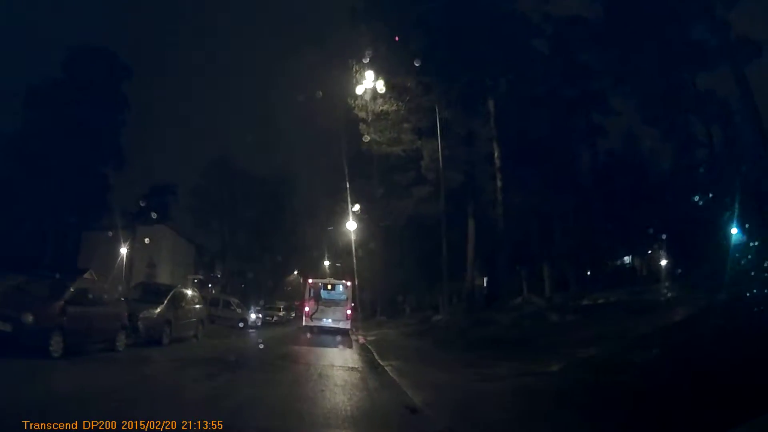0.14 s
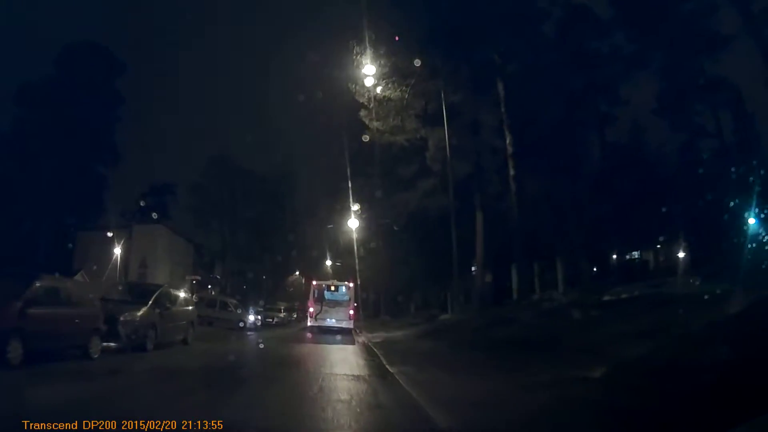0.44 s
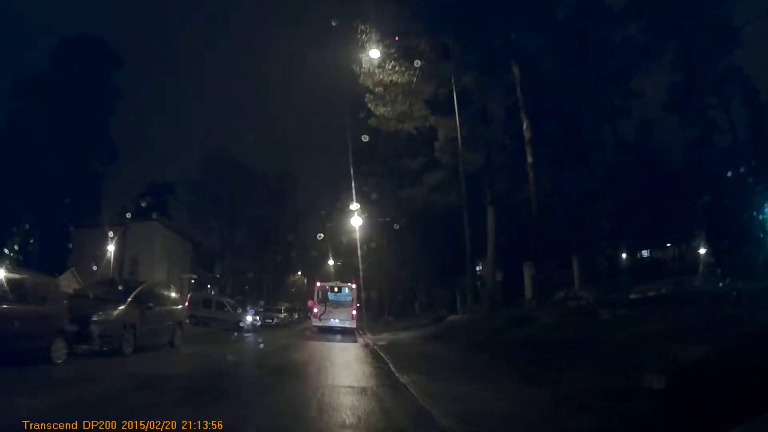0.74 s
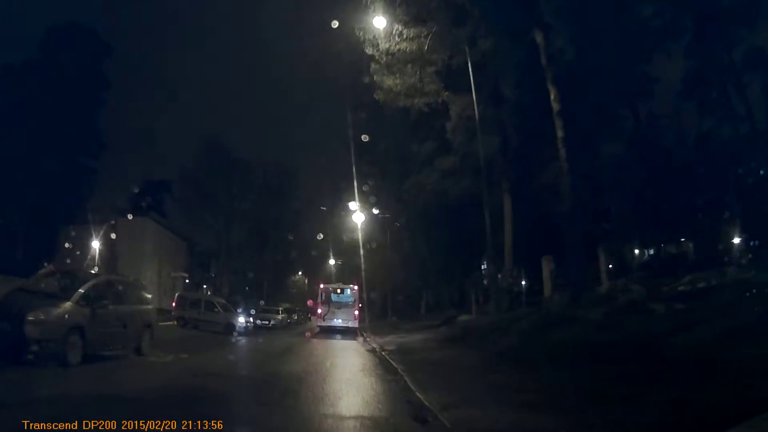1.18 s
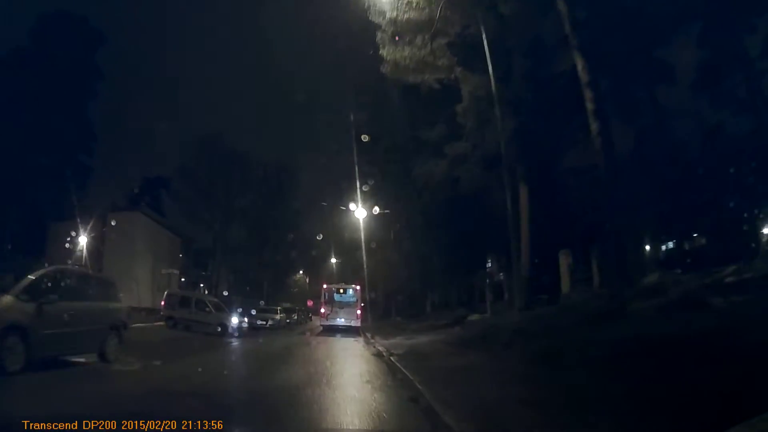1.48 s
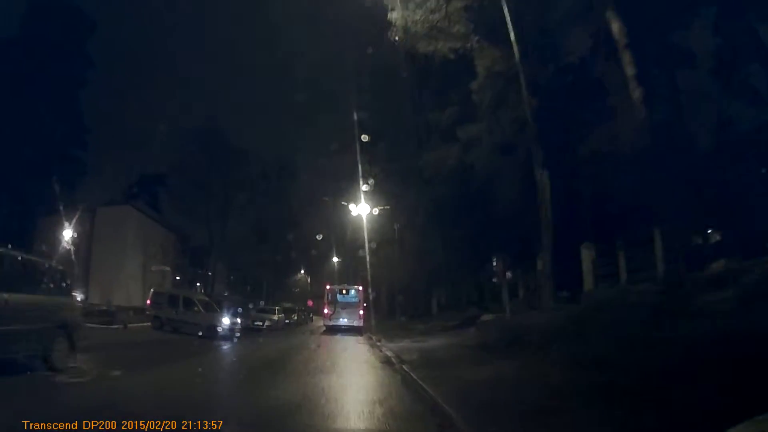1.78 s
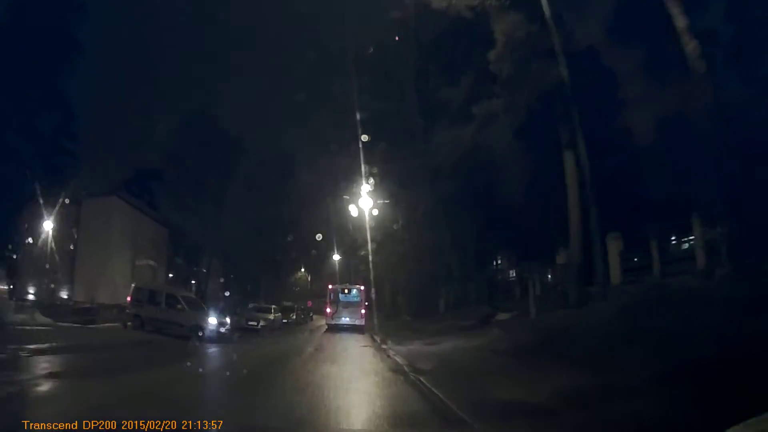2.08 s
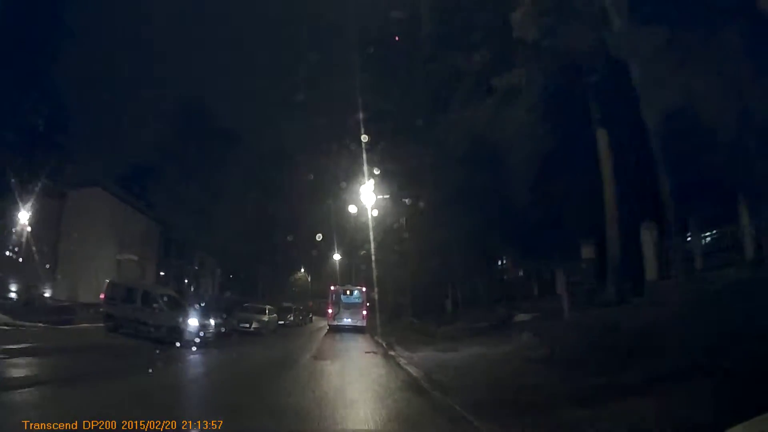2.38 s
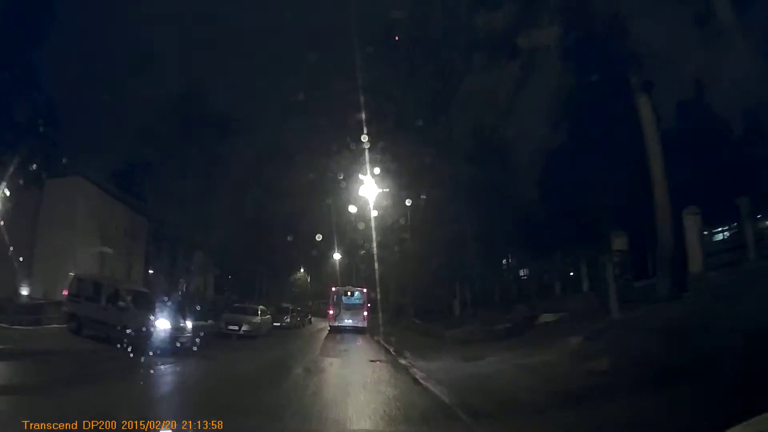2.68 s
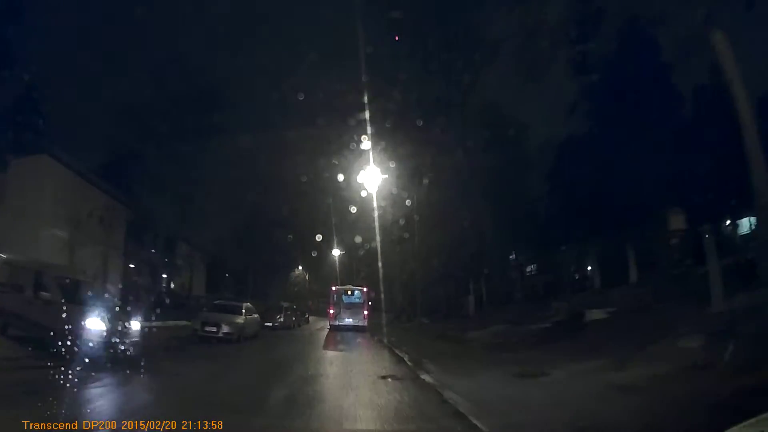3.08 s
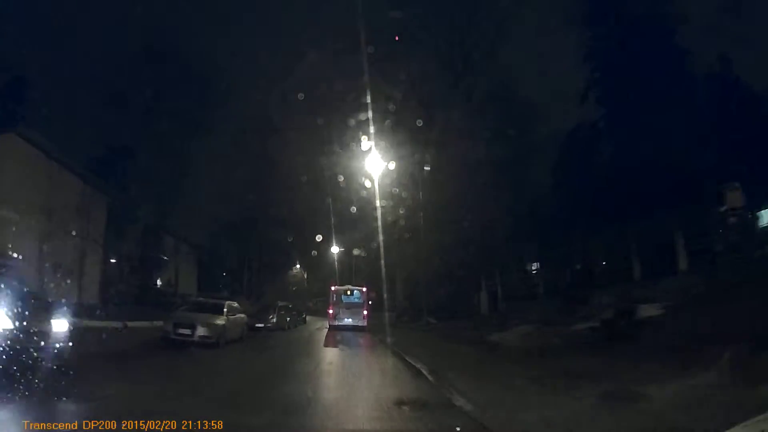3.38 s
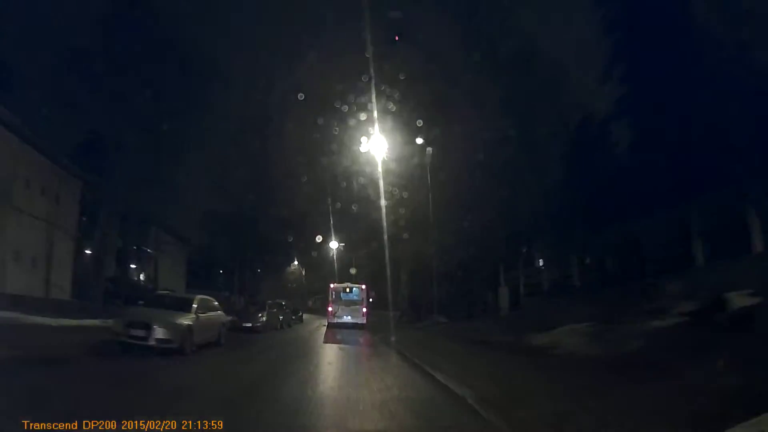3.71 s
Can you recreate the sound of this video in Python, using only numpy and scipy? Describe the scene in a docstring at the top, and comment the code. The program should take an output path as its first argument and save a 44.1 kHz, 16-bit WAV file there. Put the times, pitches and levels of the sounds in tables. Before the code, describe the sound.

A car engine speeds up, heard from inside the cabin by a small windscreen camera: a low drone rises and grows louder over steady tyre roar and faint hiss, with one sharp click midway.

```python
"""Inside a car speeding up along a wet street at night, heard by a small camera on the windscreen.
Multiples of a rising firing rate climb through the cabin booms, over coloured-noise road roar and treble hiss.
Two faint wavering lines squeak near 0.9 s; a switch snaps at 1.92 s as shaped pushes with a buzz.
Near 2.9 s quick chirps make a trill, and two decaying sines tick in the trim."""
import sys
import numpy as np
from scipy import signal
from scipy.fft import rfft, irfft
from scipy.io import wavfile
from scipy.ndimage import uniform_filter1d

SR = 44100
rng = np.random.default_rng(int(sys.argv[2]) if len(sys.argv) > 2 else 0)


def waveform_to_disk(signal):
    """Save audio, clipped to [-1, 1], as 16-bit WAV at the path in sys.argv[1]."""
    frames = np.transpose(np.atleast_2d(signal))
    scaled = np.clip(frames, -1, 1) * 32767
    samples = np.round(scaled).astype(np.int16)
    wavfile.write(sys.argv[1], SR, samples)


def amplitude_ratio(level_db):
    """Convert a level in decibels to the matching linear amplitude (field) ratio."""
    exponent = np.asarray(level_db, float) / 20
    return 10 ** exponent


N = 169785


def curve(table, x, log=False):
    """Reads a two-column table along straight lines, on a linear or log axis."""
    points, values = np.array(table, float).T
    if log:
        return np.interp(np.log(x), np.log(points), values)
    return np.interp(x, points, values)


def walk(rate_hz):
    """Random levels held 1 / rate_hz seconds and slewed twice; spread near 1."""
    hold = int(SR / rate_hz)
    steps = np.repeat(rng.standard_normal(N // hold + 1), hold)
    return 1.45 * uniform_filter1d(uniform_filter1d(steps, hold), hold)[:N]


def bands(colour, centres_hz, shared_db, own_db, rate_hz):
    """Coloured noise of rms 1; overlapping bands flicker both together and on their own."""
    hz = np.arange(N // 2 + 1) * SR / N + 1e-9
    inside = (hz > colour[0][0]) * (hz < colour[-1][0])
    spectrum = rfft(rng.standard_normal(N)) * amplitude_ratio(curve(colour, hz, log=True)) * inside
    noise = np.zeros(N)
    for hat in np.eye(len(centres_hz)):
        band = irfft(spectrum * np.interp(hz, centres_hz, hat), N)
        noise += band * amplitude_ratio(shared_db + own_db * walk(rate_hz))
    return noise / np.sqrt(np.mean(noise ** 2))


def hump(hz, width_hz, flicker_db, rate_hz):
    """A narrow flickering band of noise, rms 1."""
    colour = [(hz - 2 * width_hz, -24), (hz, 0), (hz + 2 * width_hz, -24)]
    return bands(colour, [hz], 0, flicker_db, rate_hz)


def gate(t, span_s, edge_s):
    """Rises at the start of a span and falls at its end."""
    return np.clip(np.minimum(t - span_s[0], span_s[1] - t) / edge_s + .5, 0, 1)


def engine(t):
    """Multiples of the firing rate, each weighted by the cabin at its present pitch."""
    # Each row: time in seconds, firing rate in Hz.
    firing_rate = [(0.0, 31.74), (0.27, 33.64), (0.39, 34.52), (0.47, 34.78), (0.88, 40.35), (1.15, 43.81),
                   (1.78, 52.64), (1.93, 54.3), (2.12, 56.93), (2.42, 61.83), (3.37, 73.84), (3.58, 76.65),
                   (3.7, 78.4), (3.85, 79.7)]
    # Each row: multiple of the firing rate, relative level in dB.
    orders = [(1, -4.5), (2, 0.0), (3, 1.85), (4, 3), (5, 0), (6, -3), (7, 0.5)]
    # Cabin response to an engine tone. Each row: frequency in Hz, level in dB before order and load.
    cabin = [(30, -71), (42, -48), (52, -44.5), (72, -46.5), (85, -45), (105, -43.5), (122, -48),
             (132, -43.5), (144, -37.5), (155, -44), (164, -45.5), (173, -53.5), (188, -52), (202, -62.5),
             (212, -53.5), (224, -52), (235, -50), (257, -50), (272, -53), (290, -47.5), (300, -60.5),
             (311, -56), (322, -61.5), (332, -49), (350, -48), (385, -53.5), (400, -69.5), (440, -71.5),
             (480, -71.5), (500, -58), (520, -65.5), (560, -63)]
    # Each row: time in seconds, gain from engine load in dB.
    load = [(0, -26), (0.1, -16), (0.3, -13), (0.6, -11.5), (1, -11), (1.5, -8.5), (2, -7.5), (2.5, -2),
            (3, 0), (3.4, 1.1), (3.85, 1.5)]
    speed_jitter, wobble_db, drift_turns = .001, .6, .025
    shift_turns, shift_at_hz, shift_fade_hz = 1.4, 35, 13.5

    hz = curve(firing_rate, t) * (1 + speed_jitter * walk(8.75))
    phase = 2 * np.pi * np.cumsum(hz) / SR
    tones = np.zeros(N)
    for multiple, order_db in orders:
        tone_hz = multiple * hz
        level_db = order_db + curve(cabin, tone_hz, log=True) + wobble_db * walk(6.87)
        # the lowest tones arrive late; every tone drifts a little
        shift = shift_turns * np.exp((shift_at_hz - tone_hz) / shift_fade_hz)
        drift = multiple * drift_turns * walk(3.973)
        tones += amplitude_ratio(level_db) * np.cos(multiple * phase + 2 * np.pi * (shift + drift))
    return np.sqrt(2) * tones * amplitude_ratio(curve(load, t)), phase  # sqrt(2): rms to peak


def road(t, phase):
    """Tyre and body roar with a narrow resonance, throbbing slightly with the firings."""
    # Each row: frequency in Hz, relative density in dB per Hz.
    colour = [(12, -58), (20, -15.5), (65, -13.5), (135, -7.5), (197, -8.5), (246, -3.5), (300, -7),
              (375, -3.5), (478, -6), (559, -4.5), (713, -13.5), (871, -10.5), (1060, -21.5), (1220, -24),
              (1390, -30.5), (1480, -29), (1620, -34.5), (2260, -31), (2590, -28), (3020, -40.5),
              (3450, -40), (4030, -61.5), (5240, -99), (8870, -120)]
    # Each row: time in seconds, level of the 400-1200 Hz part in dB.
    level = [(0.0, -53.5), (0.41, -52), (0.62, -52.5), (1.59, -51.5), (2.04, -50.5), (2.79, -50.5),
             (3.14, -49), (3.42, -50.5), (3.85, -50)]
    flicker_db, cycle_depth = 0.67, 0.058
    resonance_hz, resonance_width_hz, resonance_db = 2568, 86, -32  # dB against the roar
    whole_over_part_db = 3.5

    roar = bands(colour, np.geomspace(60, 3800, 10), .3 * walk(5), flicker_db, 14)
    roar = roar + amplitude_ratio(resonance_db) * hump(resonance_hz, resonance_width_hz, 2.0, 8)
    throb = 1 + cycle_depth * np.cos(phase)
    return roar * throb * amplitude_ratio(whole_over_part_db + curve(level, t))


def hiss(t):
    """Treble hiss with a narrow band in it; camera electronics pulse its upper part evenly in time."""
    # Each row: frequency in Hz, relative density in dB per Hz.
    colour = [(2370, -45), (4030, -11), (4380, -4), (4690, -1.5), (5120, -4.5), (5790, -0.5), (6290, -6.5),
              (6670, -7.5), (7880, -4.5), (8650, -9.5), (8820, -11), (9180, -2.5), (9490, 3), (9730, -5),
              (10200, -11.5), (10500, -4), (11100, -8), (11300, -11), (12000, -9.5), (13000, -25),
              (16900, -53), (22000, -120)]
    # Hiss level over time. Each row: time in seconds, level in dB.
    level = [(0, -84), (.8, -83), (.85, -81.5), (.96, -82), (1, -84.5), (1.75, -82), (1.925, -81.5),
             (1.93, -98), (1.95, -88), (1.97, -82), (2.1, -83), (2.4, -81), (2.8, -82), (2.84, -80),
             (2.96, -81), (3, -83.5), (3.85, -82)]
    flicker_db = 0.55
    narrow_hz, narrow_width_hz, narrow_db = 10700, 90, -14  # dB against the hiss
    pulse_hz, pulse_at_s, pulse_width_s = 30, .0158, .004
    pulse_db, pulse_scatter_db = 7, 1.5

    air = bands(colour, np.linspace(4500, 12500, 7), .5 * walk(25), flicker_db, 35)
    air = air + amplitude_ratio(narrow_db) * hump(narrow_hz, narrow_width_hz, 2, 30)
    turns_off_pulse = ((t - pulse_at_s) * pulse_hz + .5) % 1 - .5
    shape = np.exp(-(turns_off_pulse / pulse_hz / pulse_width_s) ** 2)
    boost_db = shape * (pulse_db + pulse_scatter_db * walk(pulse_hz))
    high_pass = signal.butter(2, 8600, "high", fs=SR, output="sos")
    upper = signal.sosfiltfilt(high_pass, air)
    return amplitude_ratio(curve(level, t)) * (air + upper * (amplitude_ratio(boost_db) - 1))


def squeak(t):
    """Thin wavering lines that drop onto their pitch."""
    # Each row: frequency in Hz, level in dB.
    lines = [(6830, -87), (10220, -87)]
    span_s, drop, settle_s = (.862, .938), .07, .004

    fall = drop * np.exp(-np.maximum(t - span_s[0], 0) / settle_s)
    bend = 1 + fall + .004 * walk(300)
    angle_per_hz = 2 * np.pi * np.cumsum(bend) / SR
    tones = sum(amplitude_ratio(db + 3.6 * walk(80)) * np.sin(hz * angle_per_hz) for hz, db in lines)
    return gate(t, span_s, .004) * tones


def switch(t):
    """A snap and two rebounds push the air, each with a buzz; the housing swings back after each."""
    # Each row: start in seconds, push, rise in seconds, hold in seconds, fall in seconds, buzz in dB.
    pushes = [(1.91997, -.15, .00016, .00003, .00032, -47), (1.92315, .052, .00007, .00032, .00037, -38),
              (1.9267, .032, .00006, .00012, .0003, -43)]
    # Each row: frequency in Hz, level in dB relative to the push's buzz.
    buzz_lines = [(4700, -3), (8500, 0), (10600, -8)]
    buzz_width_s, housing_hz, housing_width_hz = .00018, 140, 150

    force = np.zeros(N)
    for start, size, rise, hold, fall, buzz_db in pushes:
        since = t - start
        shape = np.interp(since, np.cumsum([0, rise, hold, fall]), [0, 1, 1, 0])
        burst = np.exp(-((since - rise - hold / 2) / buzz_width_s) ** 2)
        buzz = sum(amplitude_ratio(db) * np.sin(2 * np.pi * hz * since) for hz, db in buzz_lines)
        force += size * shape + amplitude_ratio(buzz_db) * burst * buzz
    # second-order high-pass
    w = 2 * np.pi * housing_hz
    b, a = signal.bilinear([1, 0, 0], [1, 2 * np.pi * housing_width_hz, w * w], SR)
    return signal.lfilter(b, a, force)


def trill(t):
    """Quick upward chirps in separate bands, varying in strength."""
    # Each row: centre frequency in Hz, sweep in Hz, level in dB.
    chirp_bands = [(9380, 600, -78), (7800, 400, -85)]
    span_s, chirps_hz = (2.829, 2.963), 107

    turn = (t - span_s[0]) * chirps_hz % 1
    chirps = np.zeros(N)
    for centre_hz, sweep_hz, db in chirp_bands:
        hz = centre_hz + sweep_hz * (turn - .5) + 60 * walk(150)
        chirps += amplitude_ratio(db + 1.3 * walk(90)) * np.sin(2 * np.pi * np.cumsum(hz) / SR)
    return gate(t, span_s, .004) * np.sin(np.pi * turn) * chirps


def ticks(t):
    """Tiny rings of hard trim: sines that start at once and die away exponentially."""
    # Each row: start in seconds, level in dB.
    rings = [(2.896, -70), (2.9985, -66.5)]
    ring_hz, t60_s = 4950, .01

    out = np.zeros(N)
    for start, db in rings:
        since = t - start
        decay = (since > 0) * np.exp(-np.log(1000) * np.abs(since) / t60_s)
        out += amplitude_ratio(db) * decay * np.sin(2 * np.pi * ring_hz * since)
    return out


def scene():
    """All sources at the microphone."""
    t = np.arange(N) / SR
    tones, phase = engine(t)
    mix = tones + road(t, phase) + hiss(t) + squeak(t) + switch(t) + trill(t) + ticks(t)
    return mix[None]


def top_cut(x):
    """Nothing passes above the cut-off."""
    return signal.sosfilt(signal.butter(12, 13140, fs=SR, output="sos"), x)


def record(dry):
    """The camera has a gap near 4 kHz and cuts the top."""
    notch_hz, notch_width_hz, top_hz = 4020, 420, 12000
    b, a = signal.iirnotch(notch_hz, notch_hz / notch_width_hz, SR)
    gapped = signal.lfilter(b, a, dry)
    low_pass = signal.butter(8, top_hz, fs=SR, output="sos")
    mix = signal.sosfilt(low_pass, gapped)
    return top_cut(mix)


dry = scene()
out = record(dry)
waveform_to_disk(out)
```